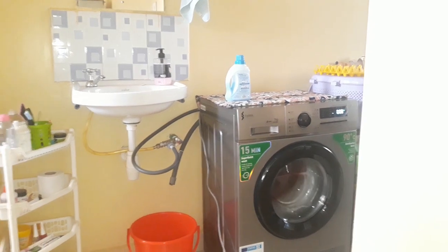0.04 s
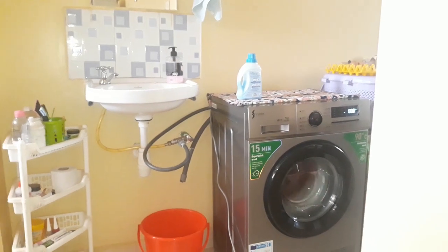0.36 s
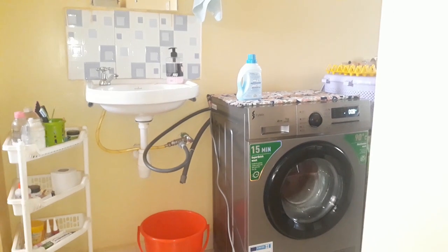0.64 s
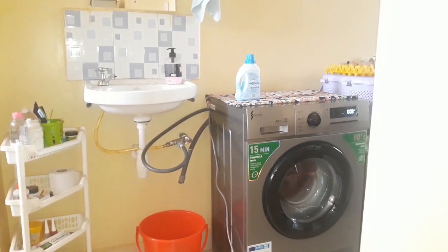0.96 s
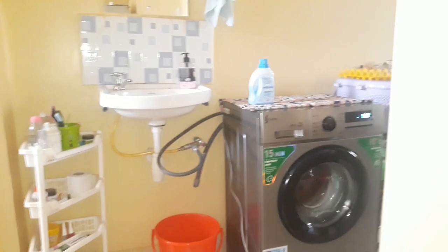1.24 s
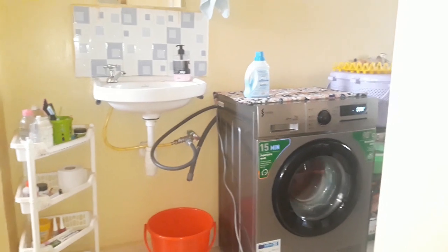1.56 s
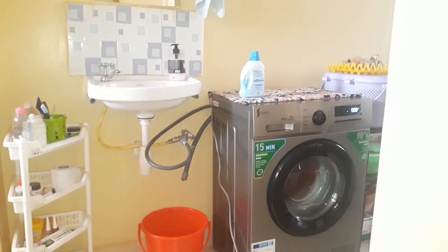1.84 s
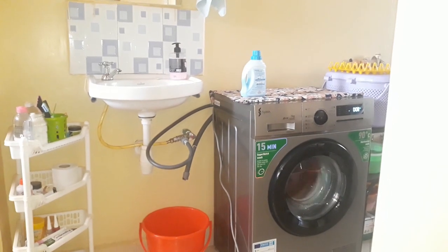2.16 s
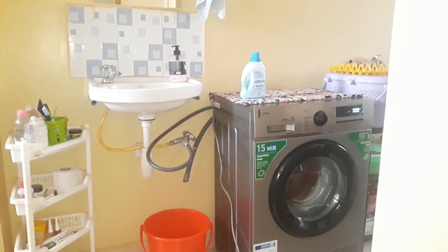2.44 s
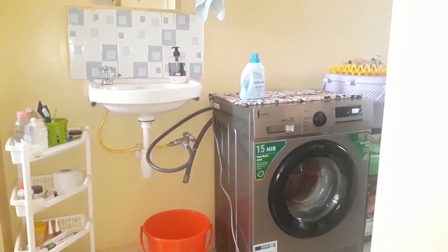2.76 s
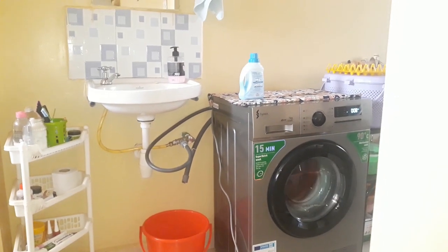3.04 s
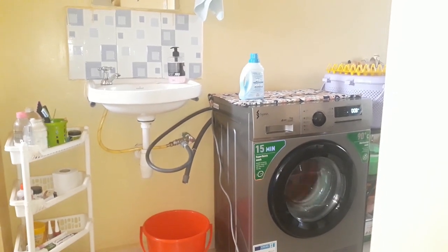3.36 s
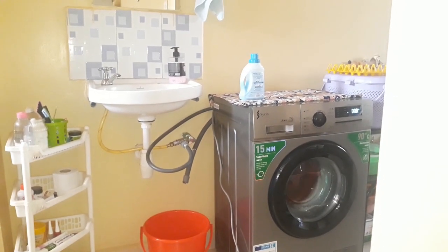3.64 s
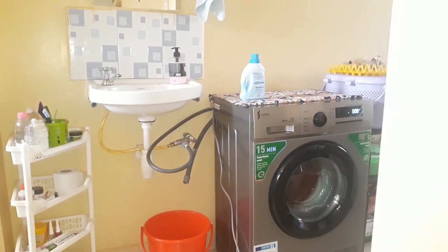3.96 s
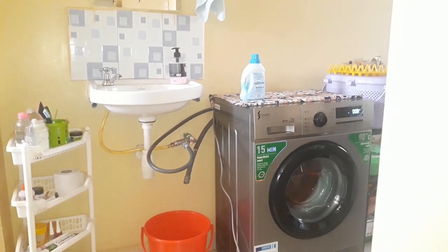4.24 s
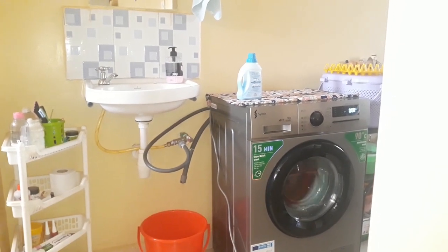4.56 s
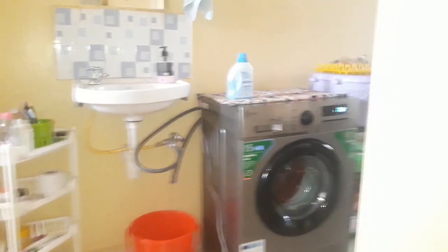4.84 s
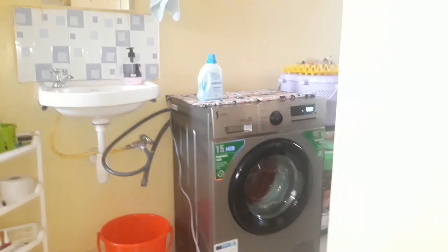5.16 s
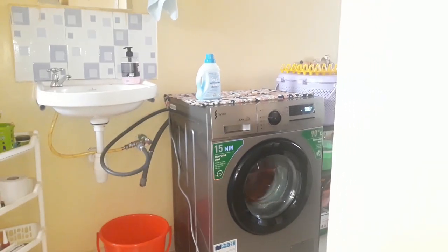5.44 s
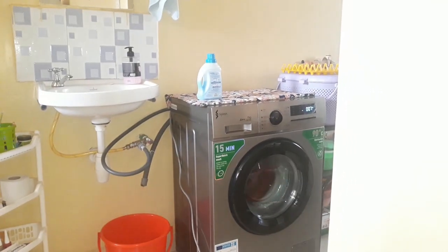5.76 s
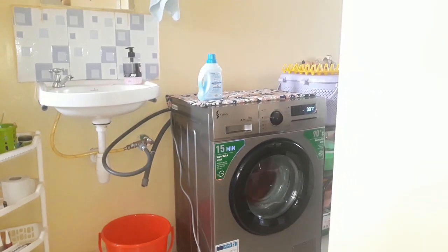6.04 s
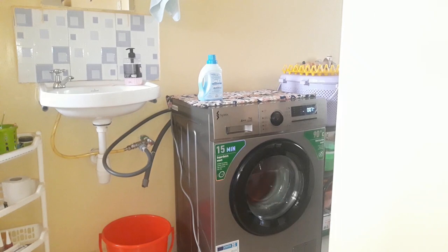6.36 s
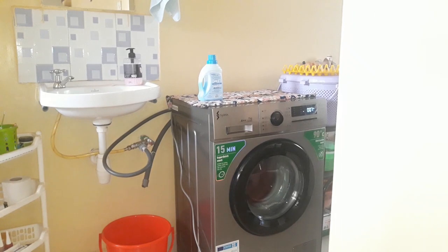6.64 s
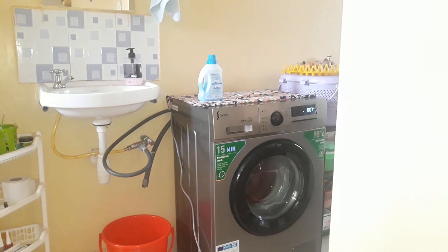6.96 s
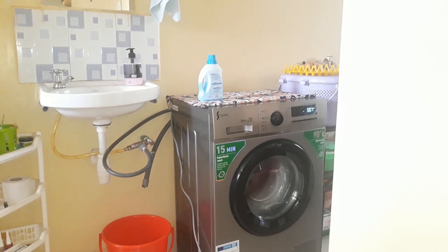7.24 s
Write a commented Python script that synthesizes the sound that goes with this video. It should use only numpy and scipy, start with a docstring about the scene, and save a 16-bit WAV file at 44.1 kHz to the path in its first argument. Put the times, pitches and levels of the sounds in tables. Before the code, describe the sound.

In a small room with hard walls, a fixed microphone picks up a washing machine in the middle of a fast spin. A low hum pulses quickly and evenly throughout, with the drum rumbling and the load brushing round underneath. A high, fluttering motor whine and a light hiss ride on top. The whine grows louder once, early on, and eases again while the spin holds its speed.

```python
"""A deep hum throbs twelve times a second: a front-loading washing machine on a steady 800 rpm spin.
One fixed mono microphone stands with it in a small hard room. The throb is the motor's hum beating
against the drum's eleventh order. Beneath it the bearings rumble, the load scuffs and air rushes round
the tub. Above it the brushes hiss and the commutator whines and buzzes, warbling with each loop of the
drive belt; once, the brushes bear harder and the whine swells."""
import sys
import numpy as np
from scipy import signal
from scipy.fft import rfft, irfft, next_fast_len
from scipy.io import wavfile
from scipy.ndimage import map_coordinates

SR = 44100
rng = np.random.default_rng(int(sys.argv[2]) if len(sys.argv) > 2 else 0)


def to_wav(s):
    """Save 16-bit WAV."""
    ch = np.atleast_2d(s).T  # columns
    pcm = np.round(np.clip(ch, -1, 1) * 32767)  # PCM
    wavfile.write(sys.argv[1], SR, pcm.astype(np.int16))


N = 326781
T = np.arange(N) / SR

# low tones of the drum: drum_order, level_db (rms); an order is a multiple of a shaft's speed
DRUM_TONES = [(4, -67), (5, -51), (6, -75), (7, -53.5), (9, -47), (10, -42.5), (11, -22.5), (12, -66),
              (13, -34.5), (15, -54.5), (17, -48.5), (24, -56.5), (25, -54.5), (30, -48.5), (39, -52),
              (52, -51), (56, -56.5), (61, -47), (76, -52)]
# low motor tones, with side tones from riding on the swinging tub: motor_order, drum_order, level_db (rms)
MOTOR_TONES = [(1, 0, -22), (1, 1, -85), (1, -1, -48), (2, 0, -42.5), (3, 0, -69)]
# bearing rumble that repeats with every drum turn: frequency_hz, density_db (per Hz)
BEARING_RUMBLE = [(190, -67), (280, -73.5), (390, -65.5), (520, -66), (610, -72), (770, -70), (900, -81),
                  (1500, -80.5), (2000, -84), (4000, -87)]
# the belt running over its pulleys: frequency_hz, density_db (per Hz)
BELT_RUN = [(250, -76), (370, -67), (500, -71.5), (620, -81.5), (770, -65.5), (950, -76.5), (1500, -81)]
# the load scuffing round: frequency_hz, density_db (per Hz)
LOAD_SCUFF = [(150, -85), (400, -71), (800, -69.5), (1100, -75), (1550, -73), (2000, -78.5), (2800, -81.5),
              (4500, -97.5), (9000, -110)]
# steady air flow round the tub: frequency_hz, density_db (per Hz)
AIR_FLOW = [(20, -93), (45, -90), (90, -68.5), (155, -54), (220, -74), (300, -67.5), (420, -66),
            (620, -71.5), (1500, -74), (2000, -85.5), (3000, -80.5), (5000, -86), (9000, -110)]
# strong tones of the commutator: motor_order, level_db (rms)
COMMUTATOR_WHINE = [(12, -56.5), (17, -56.5), (18, -54.5), (20, -62), (24, -53), (25, -58.5), (26, -52.5),
                    (27, -54), (29, -56.5), (31, -50), (32, -48), (33, -57), (34, -57), (35, -46),
                    (36, -40), (37, -43.5), (38, -52.5), (39, -51), (49, -52.5), (54, -52), (56, -52),
                    (61, -57.5), (62, -62), (69, -57.5), (71, -50), (72, -43), (73, -52), (74, -58)]
# outline of the commutator's other motor orders: pitch_hz, level_db (rms of each tone)
COMMUTATOR_BUZZ = [(1500, -58.5), (2200, -59), (3400, -66), (4700, -57.5), (6400, -57), (6900, -65.5),
                   (7500, -55.5), (8600, -59.5), (10100, -68.5), (11100, -55), (12200, -64), (13500, -62),
                   (14300, -60), (14800, -67), (15600, -61)]
# hiss of the carbon brushes: frequency_hz, density_db (per Hz)
BRUSH_HISS = [(1500, -91), (3600, -79.5), (4700, -87), (5400, -79), (5700, -72.5), (6200, -85), (6700, -90),
              (8400, -82.5), (10100, -99), (10900, -85), (11400, -75.5), (12000, -93), (13200, -88),
              (15600, -94)]

DRUM_HZ, BELT_HZ, PULLEY_RATIO = 13.2912, 9.63, 11.9137
MOTOR_HZ = DRUM_HZ * PULLEY_RATIO
SHAFTS_ALIGN_S, BELT_JOINT_S = 3.789, 3.821  # drum and motor push together; a belt loop begins
COMMUTATOR_BARS = 36
# the tub swells with each drum turn, each quarter turn, and when the heavy side meets the belt joint
ROLL_TURN_DB, ROLL_QUARTER_DB, ROLL_MEET_DB = 0.5, 0.6, 1.5
SCUFF_TURN_DB, SCUFF_MEET_DB = 4.5, 0.95
# each belt loop, half loop and drum turn tugs the rotor ahead or behind and rocks the brushes
TUG_LOOP_TURNS, TUG_HALF_TURNS, TUG_DRUM_TURNS = 0.0062, 0.0025, 0.0029
ROCK_LOOP, ROCK_HALF, ROCK_DRUM = 2, 1.5, 1.5
LOOP_LAG_CYCLES, HALF_LAG_CYCLES, LEAD_CYCLES_PER_ORDER = 0.3, -0.12, 0.28
ROCK_WIDTH_ORDERS = 2.4  # how far the rocking reaches either side of the bar rate
ROCK_CHATTER, ROCK_SEESAW = 1.5, 2.2  # random rocking: those tones together, and lower against upper
SWELL_START_S, SWELL_ATTACK_S, SWELL_HOLD_S, SWELL_RELEASE_S = 1.31, 0.38, 0.63, 0.25
SWELL_DB, CREEP_DB_PER_S = 6, 0.6


def amp(db):
    """Decibels to gain."""
    return 10 ** (np.asarray(db) / 20)


def level_at(spectrum, hz):
    """Reads a spectrum table on a log-frequency axis."""
    table_hz, level_db = np.transpose(spectrum)
    return np.interp(np.log(hz + 1), np.log(table_hz + 1), level_db)


def cycle(turns):
    """One swing for every turn."""
    return np.cos(2 * np.pi * turns)


def noise(spectrum):
    """Steady noise with a spectrum in dB per Hz."""
    size = next_fast_len(N)
    gain = amp(level_at(spectrum, np.fft.rfftfreq(size, 1 / SR))) * np.sqrt(SR / 2)
    return irfft(rfft(rng.standard_normal(size)) * gain, size)[:N]


def drift(t, top_hz, size=4096, rate_hz=400):
    """Slow random wander of rms 1."""
    hz = np.fft.rfftfreq(size, 1 / rate_hz)
    slow = irfft(rfft(rng.standard_normal(size)) / (1 + (hz / top_hz) ** 4))
    wander = np.interp(t, np.arange(size) / rate_hz, slow)
    return wander / np.sqrt(np.mean(wander ** 2) + 1e-20)


def cabinet_hum(drum, motor):
    """Cabinet panels radiate the low orders of both shafts; close pairs beat."""
    tones = sum(amp(db) * cycle(order * drum) for order, db in DRUM_TONES)
    tones += sum(amp(db) * cycle(order * motor + side * drum) for order, side, db in MOTOR_TONES)
    return np.sqrt(2) * tones * amp(0.073 * drift(T, 1.0))


def rolling_surface(turns, turn_hz, spectrum, size=8192):
    """One turn of a randomly uneven surface, passed over again and again."""
    hz = np.arange(size // 2 + 1) * turn_hz
    in_band = (hz >= spectrum[0][0]) & (hz <= spectrum[-1][0])
    harmonics = in_band * amp(level_at(spectrum, hz)) * np.exp(2j * np.pi * rng.random(len(hz)))
    surface = irfft(harmonics) * size * np.sqrt(turn_hz / 2)
    return np.interp(turns % 1 * size, np.arange(size + 1), np.append(surface, surface[0]))


def tub_rumble(drum, belt):
    """Over steady air, bearings, belt and load swell each turn, most as the heavy side meets the joint."""
    meet = cycle(drum - belt)
    bearings = rolling_surface(drum + 0.00093 * drift(T, 6.4), DRUM_HZ, BEARING_RUMBLE)
    belt_run = rolling_surface(belt, BELT_HZ, BELT_RUN)
    roll_db = ROLL_TURN_DB * cycle(drum) + ROLL_QUARTER_DB * cycle(4 * drum - 0.25) + ROLL_MEET_DB * meet
    scuff = noise(LOAD_SCUFF)
    scuff *= amp(SCUFF_TURN_DB * cycle(drum) + SCUFF_MEET_DB * meet + 0.7 * drift(T, 25.0))
    return (bearings + belt_run) * amp(roll_db) + scuff + noise(AIR_FLOW)


def wall_echoes(tones, step_s, wet_db, t60_s, count=48):
    """Hard walls echo each tone (a column of complex amplitudes) differently: warble becomes flutter."""
    delay_s = np.arange(count)[:, None] * step_s
    echoes = amp(-60 * delay_s / t60_s) * np.exp(2j * np.pi * rng.random((count, tones.shape[1])))
    echoes[1:] *= amp(wet_db) / np.linalg.norm(echoes[1:], axis=0)
    at_mic = signal.fftconvolve(tones, echoes, axes=0)[:len(tones)]
    return at_mic / np.sqrt(np.mean(abs(at_mic) ** 2, axis=0))


def brush_rocking(t, drum, belt, from_bar_rate):
    """Belt and drum rock the brushes, passing energy between the tones round the bar rate."""
    rock = ROCK_LOOP * cycle(belt - LOOP_LAG_CYCLES + LEAD_CYCLES_PER_ORDER * from_bar_rate)
    rock += ROCK_HALF * cycle(2 * belt - HALF_LAG_CYCLES) + ROCK_DRUM * cycle(drum)
    rock += ROCK_CHATTER * drift(t, 22.0) + ROCK_SEESAW * np.tanh(from_bar_rate) * drift(t, 13.0)
    return rock * np.exp(-(from_bar_rate / ROCK_WIDTH_ORDERS) ** 2)


def commutator_whine(drum, motor, belt, size=2048):
    """Brushes tick over the bars. Belt and load tug the rotor, so every turn sounds a little different."""
    turns = np.arange(np.floor(motor[0]), motor[-1] + 1)
    t = np.interp(turns, motor, T)[:, None]  # one row for each motor turn
    load, loop = np.interp(t, T, drum), np.interp(t, T, belt)
    orders = np.arange(100)
    pitch_hz = orders * MOTOR_HZ
    level_db = np.where(pitch_hz > COMMUTATOR_BUZZ[0][0], level_at(COMMUTATOR_BUZZ, pitch_hz), -np.inf)
    for order, db in COMMUTATOR_WHINE:
        level_db[round(order)] = db
    tug = TUG_LOOP_TURNS * cycle(loop) + TUG_HALF_TURNS * cycle(2 * loop) + TUG_DRUM_TURNS * cycle(load)
    tug += 0.0018 * drift(t, 15.0) + 0.0044 * drift(t, 1.0)
    tones = wall_echoes(np.exp(2j * np.pi * orders * tug), 1 / MOTOR_HZ, wet_db=1.5, t60_s=0.28)
    # a firmly pressed brush rocks less and sings louder at the bar rate
    from_bar_rate = orders - COMMUTATOR_BARS
    pressure_db = brush_pressure(t)
    rock_db = brush_rocking(t, load, loop, from_bar_rate) / amp(0.5 * pressure_db)
    tones *= amp(level_db + rock_db + (from_bar_rate == 0) * pressure_db)
    tones *= amp(0.5 * drift(t, 38.0))  # the contact flickers
    turn_waves = irfft(tones, size) * size / np.sqrt(2)
    return map_coordinates(turn_waves, [motor - turns[0], motor % 1 * size], order=1, mode="grid-wrap")


def brush_hiss(drum, motor):
    """Carbon rubs on copper, a little harder once in every motor turn and drum turn."""
    return noise(BRUSH_HISS) * amp(0.7 * cycle(motor) + 0.4 * cycle(drum) + 0.9 * drift(T, 18.0))


def brush_pressure(t):
    """How hard the brushes bear, in dB: a slow creep and one swell that rises, holds and lets go."""
    since_s = t - SWELL_START_S
    rise = np.clip(since_s / SWELL_ATTACK_S, 0, 1)
    fall = np.clip((since_s - SWELL_ATTACK_S - SWELL_HOLD_S) / SWELL_RELEASE_S, 0, 1)
    return CREEP_DB_PER_S * (t - t.mean()) + SWELL_DB * (rise - fall)


def scene():
    """The whole machine from one spot in the room; drum, motor and belt are counted in turns."""
    drum = DRUM_HZ * (T - SHAFTS_ALIGN_S)
    motor = PULLEY_RATIO * drum
    belt = BELT_HZ * (T - BELT_JOINT_S)
    body = cabinet_hum(drum, motor) + tub_rumble(drum, belt)
    brushes = commutator_whine(drum, motor, belt) + brush_hiss(drum, motor)
    return (body + brushes)[None]


def record(dry, cutoff_hz=15720):
    """The recorder behind the microphone cuts off the highest treble."""
    lowpass = signal.firwin(1023, cutoff_hz, window=("kaiser", 9), fs=SR)
    return signal.oaconvolve(dry, lowpass[None], "same")


dry = scene()
out = record(dry)
to_wav(out)
```